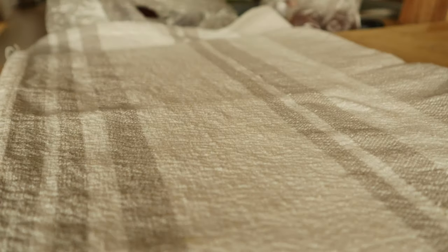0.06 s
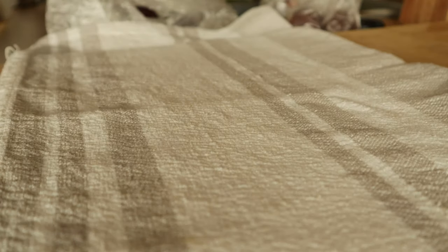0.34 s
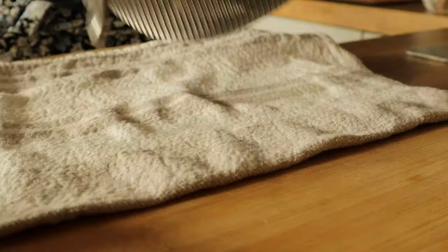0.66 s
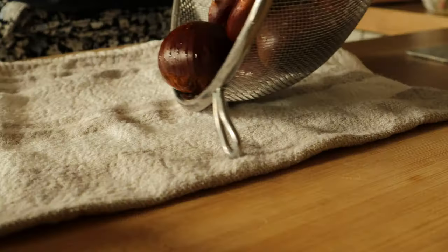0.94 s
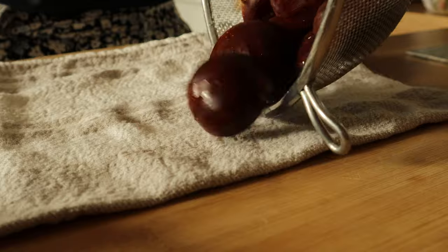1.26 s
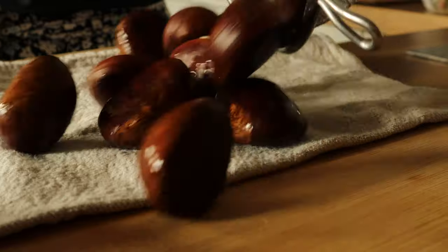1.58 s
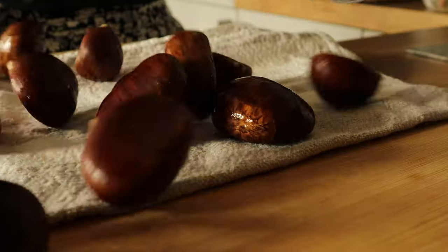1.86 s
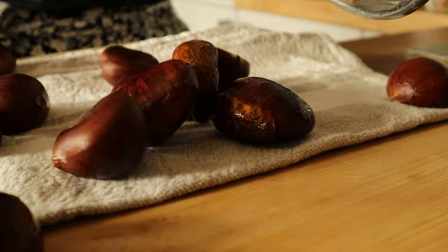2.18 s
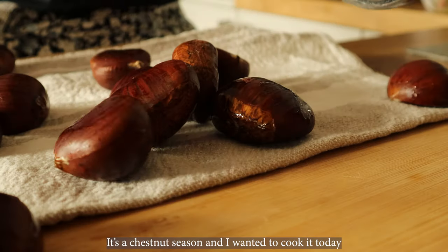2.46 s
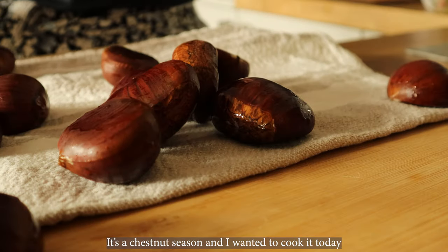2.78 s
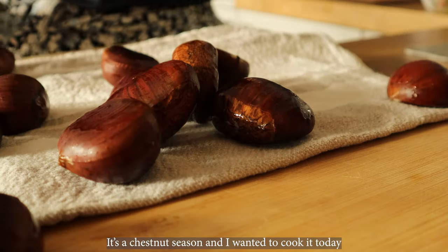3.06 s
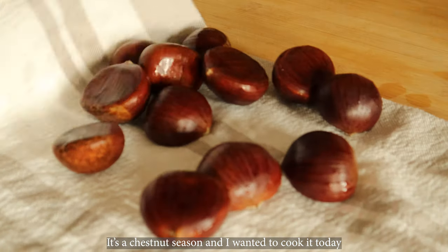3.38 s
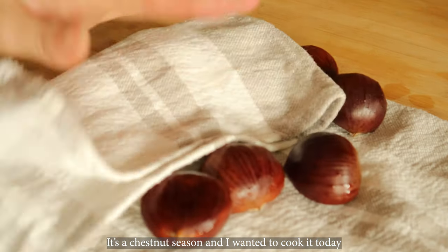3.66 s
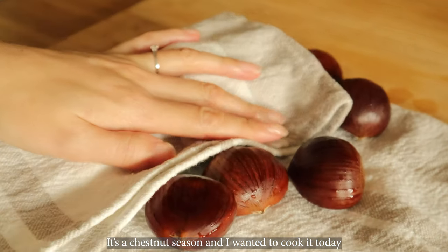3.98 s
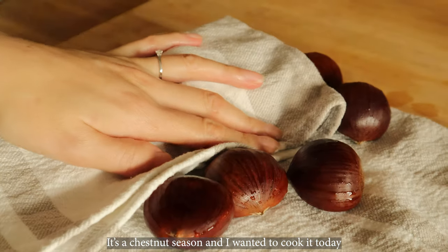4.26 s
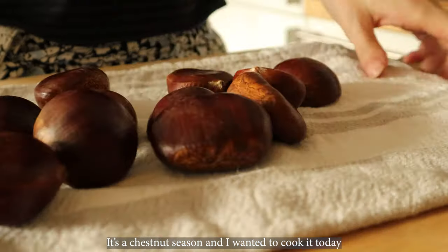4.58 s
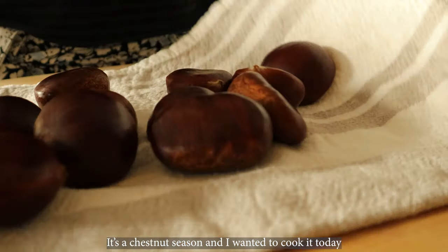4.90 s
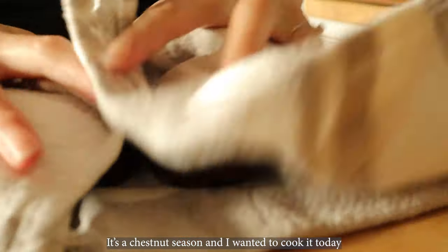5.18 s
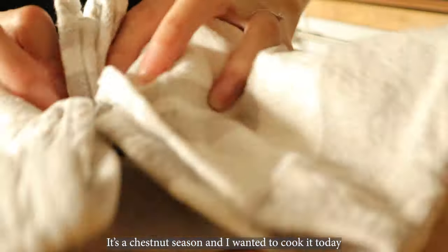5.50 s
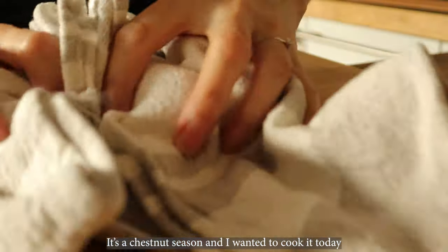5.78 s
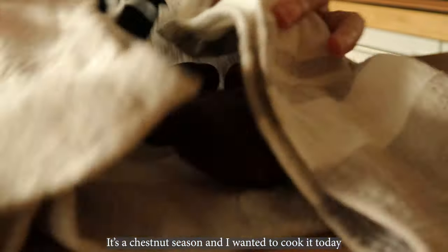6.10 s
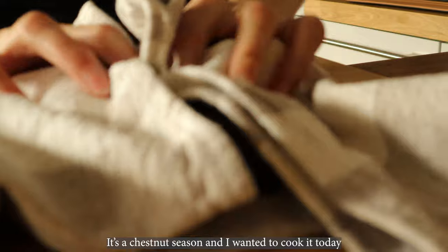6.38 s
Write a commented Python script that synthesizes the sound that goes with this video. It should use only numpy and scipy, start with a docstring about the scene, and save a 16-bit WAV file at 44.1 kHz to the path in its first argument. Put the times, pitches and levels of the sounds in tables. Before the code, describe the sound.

A quiet kitchen hums softly, with very faint electronic ticking and a faint, distant bump at the start. From about 0.8 seconds, raw chestnuts slide over a wire sieve with a light hiss and small clicks. Between 1.4 and 2.3 seconds they tumble onto a cotton towel on a wooden board: a quick cluster of dull, briefly ringing thuds, clicking shells and a low roll, ending with a harder knock on bare wood. This is the loudest part. A lull follows, with a faint brush of cloth and a couple of tiny clicks around 3.5 seconds. From 4.6 to 4.9 seconds the nuts knock lightly together as the towel is lifted. From about 5.1 seconds to the end, near 6.6, the towel rustles in repeated strokes, while the nuts roll, click and bump softly against the board. The handling is heard close up, in stereo.

```python
"""Raw chestnuts slide out of a wire sieve, hissing over the mesh, and thud onto a cotton towel on a
wooden board, which rings at each blow; a stray one knocks on bare wood. Then the towel is patted,
lifted and bunched round the nuts: cloth rustles on cloth as the shells click together and bump the board.
It is all heard close up, in stereo, in a quiet kitchen with a soft hum, a faint electronic ticking
and one far-off bump at the start."""
import sys
import numpy as np
from scipy import signal
from scipy.fft import rfft, irfft, next_fast_len
from scipy.io import wavfile

SR = 44100
rng = np.random.default_rng(int(sys.argv[2]) if len(sys.argv) > 2 else 0)


def wrap_up_sound(samples):
    """Save the sound to the file named by the first command line argument, as 16-bit audio."""
    columns = np.atleast_2d(samples).T
    # keep every value between -1 and 1, then stretch to whole-number steps
    tamed = np.clip(columns, -1, 1)
    steps = np.round(tamed * 32767).astype(np.int16)
    wavfile.write(sys.argv[1], SR, steps)


N = 288414
TIME = np.arange(N) / SR

# stereo width of most sounds, and of the room's hum: f/Hz, level/dB (side compared with middle)
WIDTH = [(40, -56), (170, -33), (350, -20.5), (700, -12.5), (1400, -2), (2800, 1.5), (6000, 3), (14000, 5)]
HUM_WIDTH = [(60, -26), (110, -10.5), (200, -4.5), (380, 1.5), (700, 4), (1290, 5), (2380, 5), (4400, 5.5),
             (8120, 7.5), (15000, 5)]
# tone colour of the room's hum: f/Hz, level/dB
HUM_COLOUR = [(13, -56), (22, -0.5), (70, -5.5), (152, -3.5), (256, -8), (294, -6), (409, -8.5), (469, -10),
              (672, -12), (792, -12), (2260, -20), (2450, -19.5), (5170, -29), (9740, -35), (16000, -33.5)]
# the ticks come in threes: level/dB of each, compared with the others
TICK_ACCENTS = [-9, 0, 0]
# the two pitches of a tick: f/Hz, level/dB, t60/s (the time it takes to fade by 60 dB)
TICK_TONES = [(2484, 1, 0.021), (4060, -6, 0.024)]
# a bump further off in the kitchen: t/s, level/dB, t60/s
BUMP = (.057, -40.5, 0.46)
# tone colour of that bump: f/Hz, level/dB
BUMP_COLOUR = [(35, -8), (70, 2), (150, -12), (350, 3), (650, -8), (1100, -20.5), (4000, -28), (12000, -70)]
# nuts sliding over the wire mesh: t/s at the loudest, length/s, level/dB, brightness/dB
SLIDES = [(0.862, 0.095, -46.5, -6), (1.037, 0.18, -53.5, -3), (1.313, 0.17, -54.5, -7),
          (1.463, 0.051, -48.5, 6), (1.532, 0.11, -40, 3), (1.596, 0.072, -34.5, -3.5),
          (1.707, 0.13, -47.5, -1.5), (1.826, 0.096, -50, -15), (1.962, 0.089, -59.5, -0.5)]
# tone colours of shell rubbing on wire: f/Hz, level/dB
MESH_HISS = [(800, -55), (2500, -1), (4500, 1), (6500, 4), (9000, 0), (12000, 0.5), (13500, -12),
             (16000, -22)]
MESH_RASP = [(200, -38), (600, -3.5), (1100, -2.5), (1700, -0.5), (3100, -5), (4500, -9.5), (7000, -17),
             (12000, -59)]
# nuts striking the sieve or each other; crack and scuff are offsets from the level:
# t/s, level/dB, crack/dB, scuff/dB, scuff t60/s, f/Hz of the nut
CLICKS = [(.836, -45.5, -6, -5, .044, 1240), (.858, -44, -20, 9, .03, 2930),
          (.8914, -42.5, -16, 7, .03, 2910), (1.045, -49, -1, 3, .044, 1470),
          (1.2785, -46, 3.5, 6.5, 0.046, 1660), (1.554, -31, -15, 4, .03, 1675),
          (1.594, -22, -20, 4, .04, 1530), (1.613, -33.5, -7, -2, .03, 2300),
          (1.654, -32.5, -2, 1, 0.034, 2520), (1.691, -40.5, -5, 3, 0.033, 3840),
          (1.7044, -30.5, -22, -4, 0.038, 1720), (1.7205, -33, -10, 1, 0.038, 1720),
          (1.737, -33, -21, -8, .035, 1635), (1.784, -40.5, -5.5, 0, .06, 5800),
          (1.8164, -40, -4, -1, .03, 1720), (1.847, -33.5, -30, -4, .02, 2120),
          (1.8717, -28.5, -18, -11, 0.027, 1680), (1.935, -39.5, -25, -10, .03, 1470),
          (1.96, -33.5, -20, -17, .035, 1660), (1.9994, -41.5, -22, -5, 0.032, 1840),
          (2.206, -37.5, -14, 8.5, 0.031, 2380), (2.2355, -32.5, -15, 1, .04, 1730),
          (2.249, -30.5, -30, -1.5, 0.046, 1715), (3.4814, -46, -25, -9, .03, 890),
          (3.687, -44.5, -8.5, 2, 0.061, 1780), (4.576, -36.5, -20, 2, 0.078, 1870),
          (4.6069, -37, -20.5, -2, 0.087, 1335), (4.677, -45.5, -16, 0, 0.15, 1900),
          (4.732, -41.5, -25, -2, .05, 1670), (4.759, -37, -24, -1.5, .09, 2110),
          (4.8369, -37, -23, 2.5, 0.047, 3190), (4.85, -38.5, -25, 3, 0.068, 2910),
          (4.891, -40, -26, 1, .08, 2100), (4.906, -36, -36, -13, .05, 1990),
          (4.92, -38, -27, -3, .06, 2110), (5.421, -30.5, -34, -6, 0.041, 1600),
          (5.434, -36, -28, -5, .04, 1400), (5.8695, -33, -28, 6, 0.013, 2610),
          (6.154, -40, -15, -4, .03, 2570), (6.171, -39, -22, -8, .03, 2640),
          (6.1807, -46.5, -2.5, -2, .03, 2530), (6.456, -40.5, -25, 1.5, .07, 1580)]
# the tones a nut rings with: multiple of its pitch, level/dB, t60/s
SHELL_TONES = [(.62, -3, 0.01), (1, 2.5, 0.029), (1.13, -5, 0.022), (1.4, -7.5, 0.019), (1.9, -14, 0.016)]
# the tones the board rings with on its counter: f/Hz, level/dB, t60/s
BOARD_TONES = [(78.8, -11.5, 0.13), (121.9, -19.5, 0.41), (137.5, -12.5, 0.13), (197.66, -12, 0.27),
               (226.2, -15, 0.25), (361, -6, 0.026), (372.4, -21.0, 0.39), (384.3, 2.0, 0.039),
               (456, -1.5, 0.03), (615, -8, 0.028), (685, -5.5, 0.052), (789, -1.5, 0.033),
               (923, -14.0, 0.12), (954.6, 5.5, 0.047), (1090, -3.0, 0.01), (1259, 0.5, 0.049),
               (1595, -2, 0.04), (2120, -15, 0.023)]
# blows on the board, dull through the towel and hard on bare wood:
# t/s, level/dB, top f/Hz (higher is harder), bottom f/Hz, factor on ring time, spot along the board (0-1)
BLOWS = [(1.3743, -5.5, 288, 60, 0.79, 0.9), (1.4396, -25, 170, 55, 1, 0.71),
         (1.4997, -16, 214, 60, 0.74, 0.88), (1.5756, -3, 356, 85, 0.83, 0.86),
         (1.594, -10.5, 486, 160, 0.77, 0.53), (1.6416, -1.5, 247, 233, 0.96, 0.89),
         (1.669, -22, 340, 35, 1.3, 0.45), (1.697, -11, 220, 80, 1.34, 0.78),
         (1.7066, -15, 710, 335, 0.54, 0.78), (1.725, -15.5, 555, 140, 1.2, 0.11),
         (1.7359, -11.5, 450, 70, 0.87, 0.52), (1.7964, -7, 334, 91, 0.8, 0.58),
         (1.8106, -11.5, 260, 55, 0.57, 0.91), (1.844, -11, 516, 170, 0.27, 0.15),
         (1.8475, -0.5, 377, 125, 0.73, 0.45), (1.8775, -24, 564, 110, 1.1, 0.76),
         (1.934, -12.5, 219, 170, 1.35, 0.92), (1.9984, -24, 240, 40.7, 0.29, 0.73),
         (2.0238, -15.5, 990, 400, 1.05, 0.3), (2.1092, -28.5, 173, 50, 0.85, 0.87),
         (2.1465, -28.5, 500, 155, 1.55, 0.56), (2.207, -14.5, 796, 575, 1, 0.39),
         (2.2117, -15, 425, 115, 0.54, 0.72), (2.2359, -19, 900, 155, 0.99, 0.11),
         (2.249, -5, 1120, 414, 0.84, 0.85), (2.2536, -18, 500, 100, 0.77, 0.31),
         (2.2786, -23, 800, 189, 1.8, 0.58), (4.5789, -25, 1030, 575, 0.54, 0.36),
         (4.5834, -19.0, 191, 60, 0.67, 0.51), (4.608, -23.5, 1160, 210, 0.3, 0.85),
         (4.6111, -21, 187, 80, 0.56, 0.45), (4.6784, -28.5, 700, 45, 0.46, 0.47),
         (4.7344, -25, 270, 215, 0.44, 0.41), (4.761, -33, 1360, 900, 1.4, 0.65),
         (4.839, -33, 670, 265, 1.2, 0.52), (4.8508, -30.5, 670, 470, 1.4, 0.51),
         (4.8935, -30, 525, 345, 1.2, 0.76), (4.921, -31, 684, 300, 1.5, 0.85),
         (5.1984, -26, 110, 45, 1.04, 0.94), (5.2262, -28.5, 480, 126, 1.2, 0.58),
         (5.4233, -25.5, 1590, 1010, 1, 0.98), (5.4296, -27.5, 230, 100, 1.1, 0.02),
         (5.438, -25.5, 1470, 200, 0.98, 0.59), (5.557, -30, 220, 35, 1.5, 0.27),
         (5.6909, -30.0, 100, 60, 0.8, 0.53), (5.869, -26.5, 830, 725, 0.7, 0.17),
         (5.8731, -29, 210, 60, 0.94, 0.46), (5.9255, -31, 180, 80, 0.89, 0.54),
         (6.1353, -23, 100, 70, 1.2, 0.55), (6.1637, -16, 230, 65, 0.72, 0.54),
         (6.183, -21.5, 330, 35, 0.72, 0.58), (6.2741, -20, 151, 60, 0.43, 0.82),
         (6.2919, -22.5, 240, 60, 1.3, 0.09), (6.306, -17.5, 148, 65, 0.71, 0.07)]
# nuts rolling along the towel: t/s at the loudest, length/s, level/dB
ROLLS = [(1.676, 0.21, -26.5), (3.64, 0.2, -52.5), (5.242, 0.26, -38.5), (5.6, 1.0, -45.5),
         (6.46, 0.16, -39.5)]
# strokes of the towel: t/s at the loudest, length/s, level/dB, brightness/dB
STROKES = [(3.54, 0.1, -57.5, 4.5), (3.704, 0.037, -51.5, -12), (4.729, 0.036, -45, -12),
           (4.768, 0.044, -47, -5.5), (4.918, 0.06, -52, -32), (5.142, 0.24, -53.5, 2),
           (5.148, 0.068, -52, -45), (5.285, 0.16, -46.5, -3), (5.415, 0.076, -44.5, -6.5),
           (5.527, 0.073, -41, -5), (5.577, 0.073, -40, -5.5), (5.681, 0.15, -46, -5),
           (5.822, 0.039, -46, -4), (5.862, 0.069, -42.5, -8), (5.942, 0.11, -42, -6.5),
           (6.073, 0.084, -44.5, -2), (6.178, 0.077, -45, -8.5), (6.294, 0.077, -47.5, -2.5),
           (6.354, 0.07, -44, -3.5), (6.463, 0.1, -45, -8.5), (6.53, 0.064, -45.5, -4)]
# tone colours of the towel's threads, layers and folds: f/Hz, level/dB
THREAD_HISS = [(800, -52), (2500, -5), (4500, -2.5), (7000, 1.5), (10000, 2.5), (12000, 3), (13500, -10.5),
               (16000, -24)]
CLOTH_RASP = [(500, -39), (1200, 1), (1600, 3.5), (2800, 1.5), (4200, -1.5), (7000, -9.5), (12000, -35)]
FOLD_RUSTLE = [(100, -32), (350, 9.5), (600, -1), (850, 11.5), (1250, -5.5), (2000, -3), (5000, -76)]


def from_db(db):
    """Turn decibels into a gain to multiply by."""
    return 10 ** (np.asarray(db) / 20)


def rms_one(x):
    """Scale a sound so that its average strength (rms) is 1."""
    return x / np.sqrt(np.mean(x ** 2) + 1e-20)


def at_hz(points, hz):
    """Read between the rows of a table, on a scale where all octaves are equally wide."""
    f, value = np.transpose(points)
    return np.interp(np.log(np.maximum(hz, 1)), np.log(f), value)


def butter(x, hz, kind, order=2):
    """Keep what lies below ("low") or above ("high") a frequency."""
    return signal.sosfilt(signal.butter(order, hz, kind, fs=SR, output="sos"), x)


def add(out, s, sound):
    """Mix a sound in, starting at s seconds."""
    at = round(s * SR)
    out[:, at:at + sound.shape[1]] += sound[:, :N - at]


def noise(spectrum, size=N, side_curve=WIDTH):
    """Stereo noise with a given tone colour, alike in both ears in the bass and wide in the treble."""
    n = next_fast_len(size)
    hz = np.arange(n // 2 + 1) * SR / n
    mid, side = rfft(rng.standard_normal((2, n)))
    width = from_db(at_hz(side_curve, hz))
    colour = from_db(at_hz(spectrum, hz)) / np.hypot(1, width) * (hz > 15)
    left_right = mid + width * side * [[1], [-1]]
    return rms_one(irfft(colour * left_right, n)[:, :size])


def spread(x, phase_rad=1.79, width_db=3.0):
    """Place a close sound between the ears: their waves are more out of step the higher the pitch."""
    n = next_fast_len(len(x) + 512)
    width = from_db(at_hz(WIDTH, np.arange(n // 2 + 1) * SR / n) + width_db)
    side = irfft(rfft(x, n) * width * np.exp(1j * phase_rad), n)[:len(x)]
    return x + side * [[1], [-1]]


def ringing(tones, chance_db, size):
    """One strike: a set of fading tones, each a little louder or softer by chance."""
    hz, db, t60 = np.transpose(tones)[:, :, None]
    t = TIME[:size]
    fades = from_db(db + chance_db * rng.standard_normal(db.shape) - 60 * t / t60)
    ring = np.sum(fades * np.cos(2 * np.pi * hz * t), axis=0)
    ring[0] /= 2   # the step at contact is shared by two samples
    return ring


def grain(per_s, depth_db):
    """Rubbing surfaces stick and slip: a gain that jumps about at the given rate."""
    steps = rng.standard_normal(N // 8)
    return rms_one(from_db(depth_db * np.interp(TIME * per_s, np.arange(len(steps)), steps)))


def swells(s, length_s, db, shape=1.37):
    """Gain of overlapping movements: each rises and fades, within 6 dB of its peak for its length."""
    t = TIME[::64]
    from_peak = np.abs(2 * (t[:, None] - s) / length_s)
    each = from_db(db) / 2 ** np.minimum(from_peak ** shape, 20)
    return np.interp(TIME, t, np.sqrt(np.sum(each ** 2, axis=1)))


def room_hum(level_db=-48.5):
    """The room hums softly: a steady, low noise from all around."""
    return from_db(level_db) * butter(noise(HUM_COLOUR, side_curve=HUM_WIDTH), 11500, "low", order=6)


def ticking(per_s=25, first_s=0.0105, level_db=-57, top_hz=5000):
    """Faint electronic chirps, evenly spaced; two of every three stand just above the hum."""
    s = np.arange(first_s, N / SR, 1 / per_s)
    db = level_db + np.resize(TICK_ACCENTS, len(s)) + rng.standard_normal(len(s))
    pulses = np.zeros(N)
    pulses[(s * SR).astype(int)] = from_db(db)
    softened = butter(pulses, top_hz, "low", order=4)
    chirps = signal.fftconvolve(softened, ringing(TICK_TONES, chance_db=0.89, size=2000))[:N]
    return spread(chirps, width_db=-14)


def far_bump():
    """A dull knock, blurred by the room into a fading puff of noise."""
    s, db, t60 = BUMP
    out, t = np.zeros((2, N)), TIME[:SR // 2]
    add(out, s, from_db(db - 60 * t / t60) * noise(BUMP_COLOUR, size=len(t)))
    return out


def sieve(hiss_db=3.5):
    """Shells skip from wire to wire as the sieve tips; a bright slide hisses more than it rasps."""
    s, length_s, db, bright_db = np.transpose(SLIDES)
    hiss = swells(s, length_s, db + bright_db + hiss_db) * noise(MESH_HISS)
    rasp = swells(s, length_s, db) * noise(MESH_RASP)
    return grain(per_s=450, depth_db=2.7) * (hiss + rasp)


def shell_clicks(crack_boost_db=11.5, crack_t60=0.039, rise_s=0.0006):
    """Each touch makes a bright crack, a scuff and a short ring whose pitch is set by the nut's size."""
    out, t = np.zeros((2, N)), TIME[:4000]
    bite = 1 - np.exp(-t / rise_s)   # the contact takes a moment to build
    for s, db, crack_db, scuff_db, scuff_t60, pitch_hz in CLICKS:
        tones = np.array(SHELL_TONES) * [pitch_hz, 1, 1]
        ring = spread(ringing(tones, chance_db=0.89, size=len(t)))
        scuff = from_db(scuff_db - 60 * t / scuff_t60) * noise(MESH_RASP, size=len(t))
        crack = from_db(crack_db + crack_boost_db - 60 * t / crack_t60) * noise(THREAD_HISS, size=len(t))
        add(out, s, from_db(db) * (ring + scuff + crack) * bite)
    return out


def board_blows(spot_db=5.5, chance_db=0.7):
    """Nuts land and hands press, and the board rings; a harder contact wakes higher tones."""
    out, t = np.zeros((1, N)), TIME[:14000]
    hz, tone_db, t60 = np.transpose(BOARD_TONES)
    waves = np.cos(2 * np.pi * hz[:, None] * t)
    waves[:, 0] /= 2   # the step at contact is shared by two samples
    for s, db, top_hz, bottom_hz, ring_factor, spot in BLOWS:
        favour = np.cos(np.pi * spot * np.arange(1, len(hz) + 1))   # the spot picks which tones answer
        gains = from_db(tone_db + spot_db * favour + chance_db * rng.standard_normal(len(hz)))
        fades = from_db(-60 * t / (ring_factor * t60[:, None]))   # the load sets how long they ring
        ring = gains @ (waves * fades)
        blow = butter(butter(ring, top_hz, "low", order=3), bottom_hz, "high")
        add(out, s, from_db(db) * blow[None] / np.abs(blow).max())
    return spread(out[0])


def rolling(top_hz=130, bottom_hz=45, ring_factor=0.38):
    """Lumpy nuts roll along the towel and keep the board rumbling; hands on the board shorten its ring."""
    lumps = rng.standard_normal(N) * grain(per_s=40, depth_db=4.0)
    padded_push = butter(butter(lumps, top_hz, "low"), bottom_hz, "high")
    damped_tones = np.array(BOARD_TONES) * [1, 1, ring_factor]
    rumble = signal.fftconvolve(padded_push, ringing(damped_tones, chance_db=0.47, size=12000))[:N]
    return spread(swells(*np.transpose(ROLLS)) * rms_one(rumble))


def towel(hiss_db=-1.0, rasp_db=-1.5, folds_db=-7.5, folds_follow=0.38):
    """Layers rub; a light, bright stroke hisses in the threads, a heavy, dull one rustles the folds."""
    s, length_s, db, bright_db = np.transpose(STROKES)
    threads = swells(s, length_s, db + bright_db + hiss_db) * noise(THREAD_HISS)
    layers = swells(s, length_s, db + rasp_db) * noise(CLOTH_RASP)
    folds = swells(s, length_s, db - folds_follow * bright_db + folds_db) * noise(FOLD_RUSTLE)
    hiss = grain(per_s=690, depth_db=1.9) * threads
    rustle = grain(per_s=300, depth_db=2.2) * (layers + folds)
    return hiss + rustle + swells(s, length_s, db) * snags()


def snags(each_per_s=22, level_db=-6.0, size_db=2.5, t60=0.009):
    """Threads catch and let go at random: tiny snaps in two tone colours, a few stronger than the rest."""
    out, t = np.zeros((2, N)), TIME[:500]
    for colour in (CLOTH_RASP, THREAD_HISS):
        lets_go = rng.random(N) < each_per_s / SR
        strength = from_db(level_db + size_db * np.minimum(rng.exponential(1, N), 3))
        snap = noise(colour, size=len(t)) * from_db(-60 * t / t60)
        out += signal.fftconvolve((lets_go * strength)[None], snap, axes=1)[:, :N]
    return out


def kitchen_echo(x, t60=0.34, level_db=-17, gap_s=0.004):
    """The room throws the sound back as a short blur, weak in the bass where the near board wins."""
    t = TIME[:SR // 2]
    colour = [(60, -23), (200, 1), (400, -2), (1000, -5.5), (4000, -8), (14000, -10.5)]   # f/Hz, level/dB
    tail = noise(colour, size=len(t)) * from_db(-60 * t / t60) * (t > gap_s)
    tail /= np.sqrt(np.sum(tail ** 2) / 2)
    return from_db(level_db) * signal.fftconvolve(x, tail, axes=1)[:, :N]


def scene(lean_right=0.048, shadow_hz=600):
    """Nuts and cloth lie a little to the right, which only their higher sounds give away."""
    background = room_hum() + ticking() + far_bump()
    near = sieve() + shell_clicks() + board_blows() + rolling() + towel()
    near += lean_right * butter(near, shadow_hz, "high", order=1) * [[-1], [1]]
    return background + near + kitchen_echo(near)


def record(dry):
    """Clip any peak beyond full scale, then cut the very highest treble."""
    treble_cut = signal.ellip(10, .1, 80, 15900, fs=SR, output="sos")
    return signal.sosfilt(treble_cut, np.clip(dry, -1, 1))


dry = scene()
out = record(dry)
wrap_up_sound(out)
```